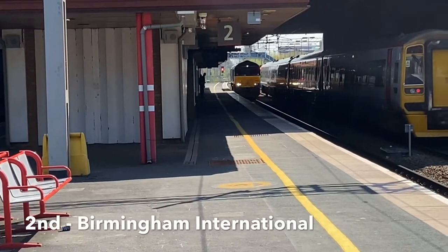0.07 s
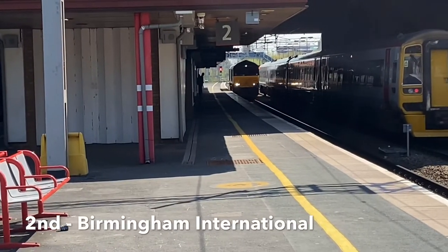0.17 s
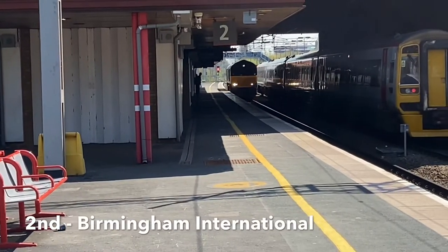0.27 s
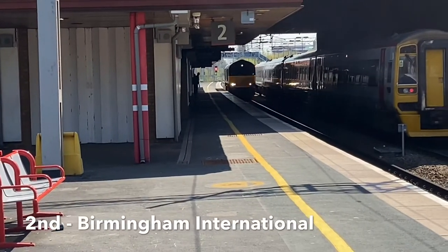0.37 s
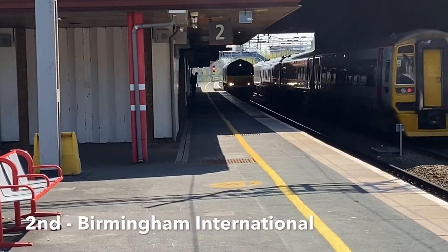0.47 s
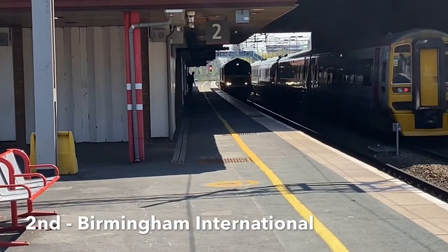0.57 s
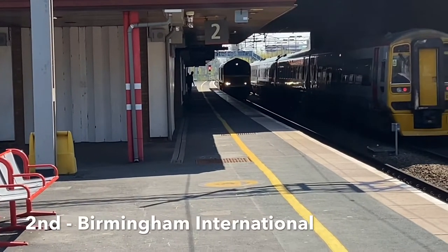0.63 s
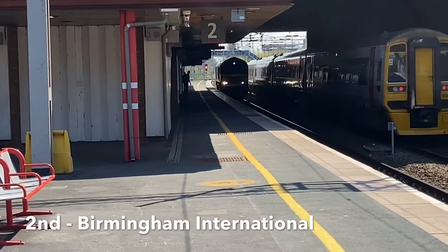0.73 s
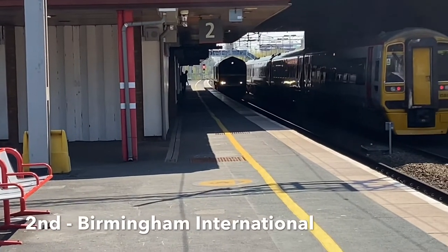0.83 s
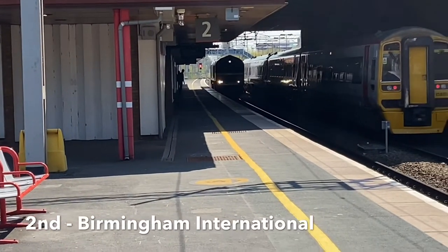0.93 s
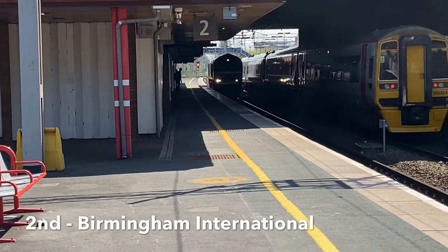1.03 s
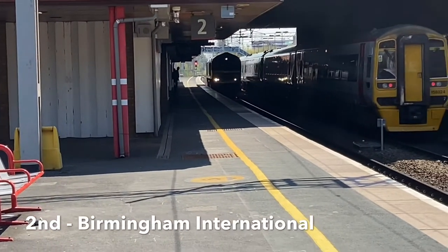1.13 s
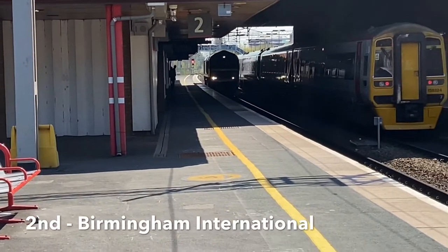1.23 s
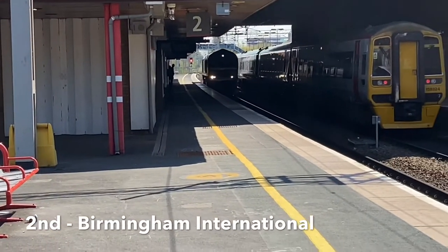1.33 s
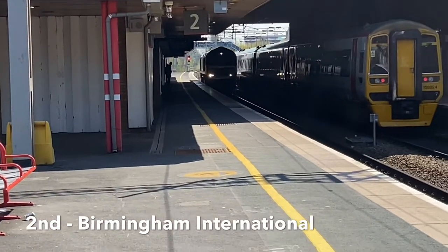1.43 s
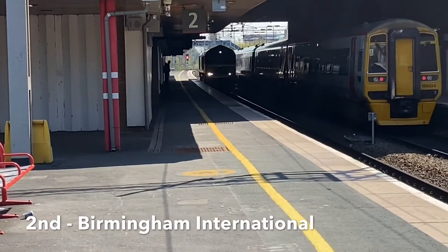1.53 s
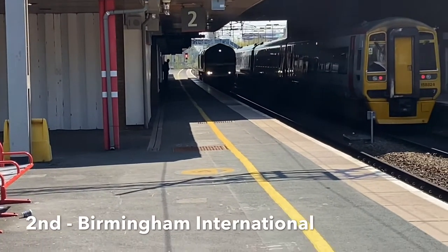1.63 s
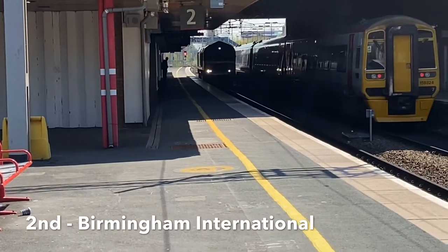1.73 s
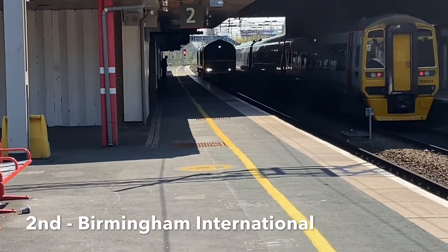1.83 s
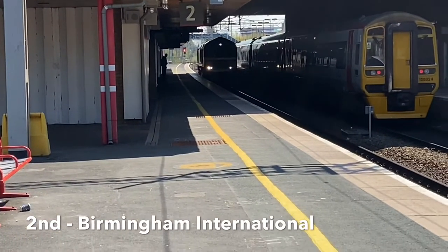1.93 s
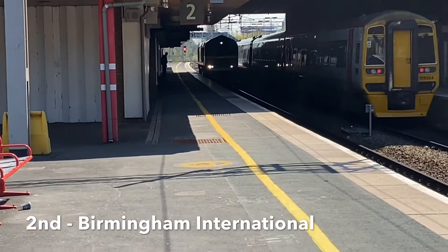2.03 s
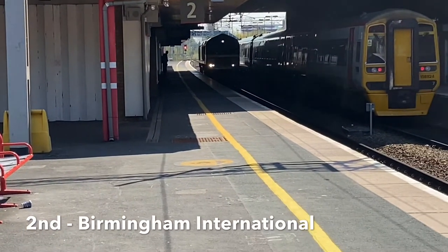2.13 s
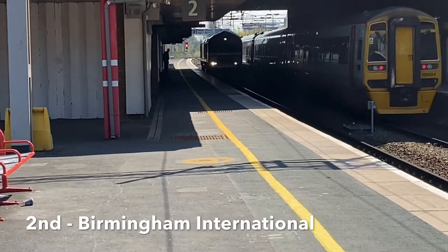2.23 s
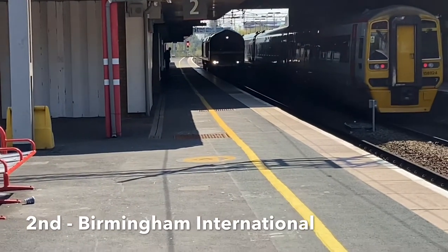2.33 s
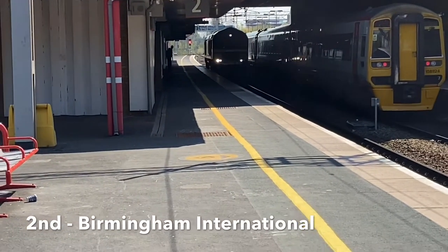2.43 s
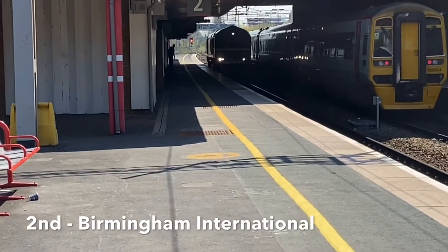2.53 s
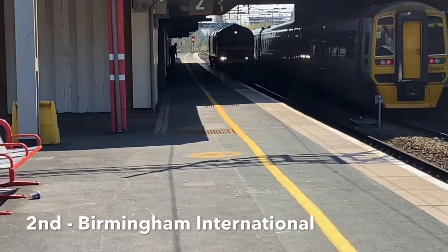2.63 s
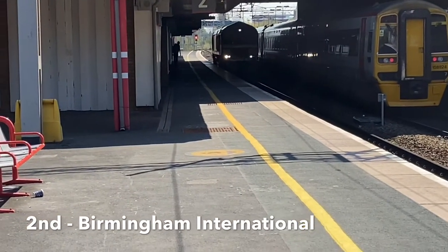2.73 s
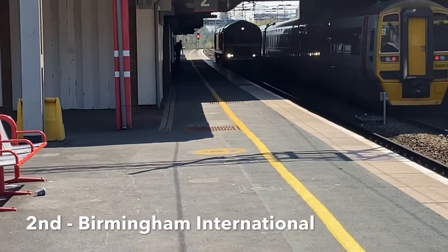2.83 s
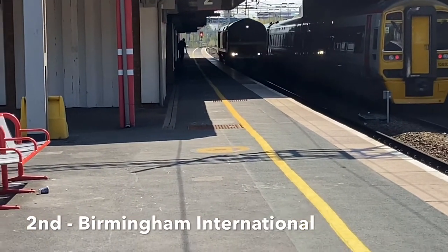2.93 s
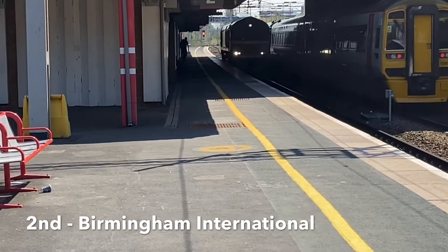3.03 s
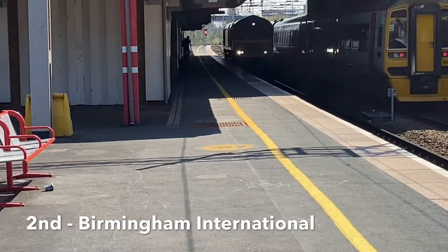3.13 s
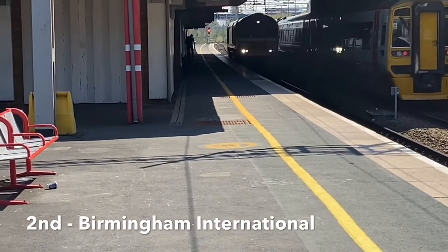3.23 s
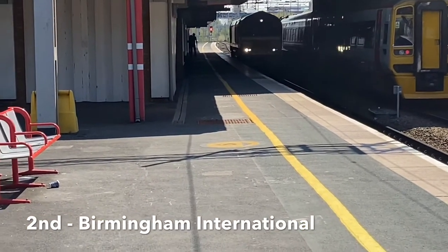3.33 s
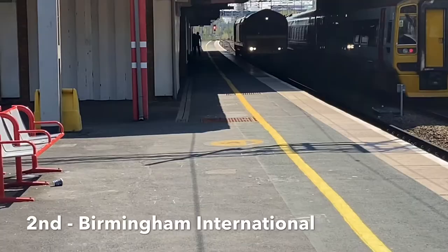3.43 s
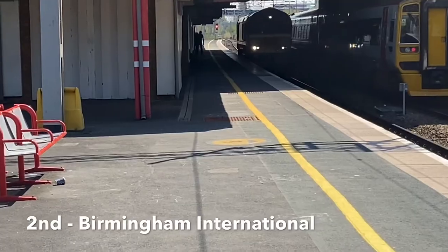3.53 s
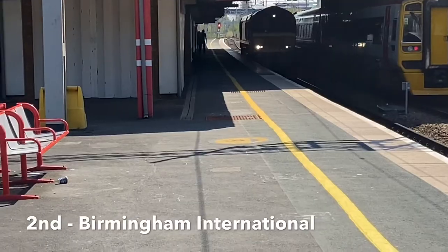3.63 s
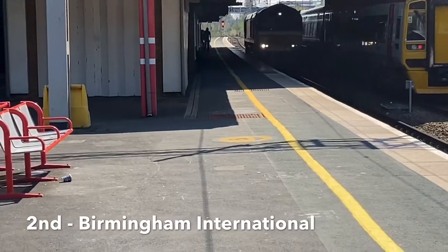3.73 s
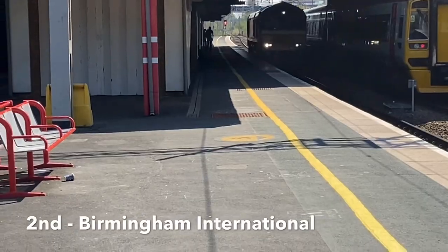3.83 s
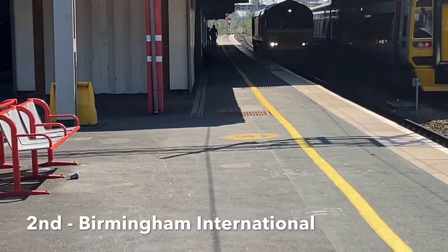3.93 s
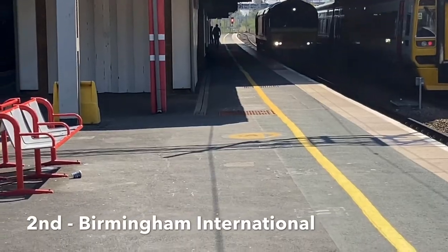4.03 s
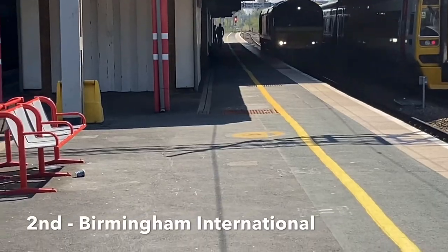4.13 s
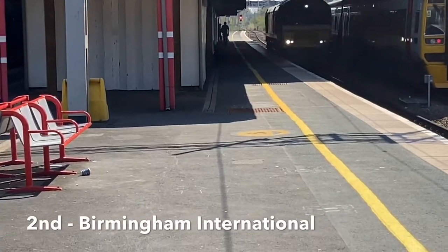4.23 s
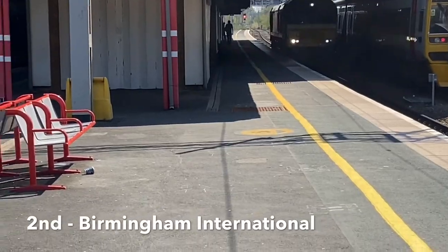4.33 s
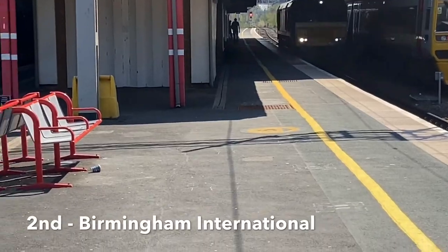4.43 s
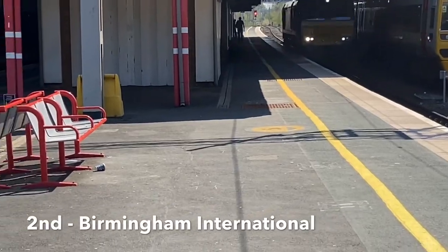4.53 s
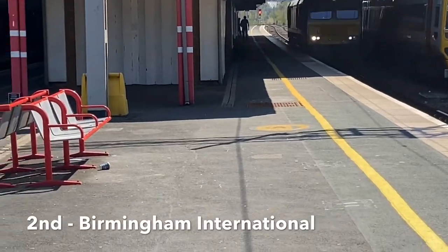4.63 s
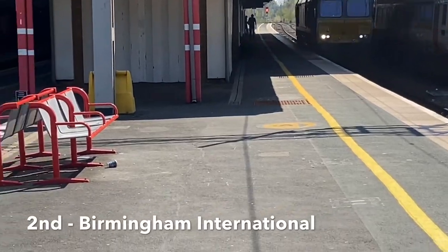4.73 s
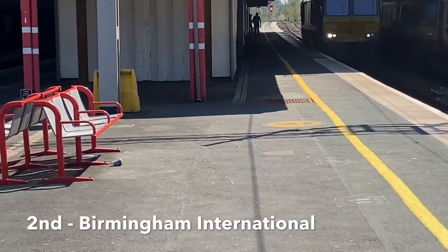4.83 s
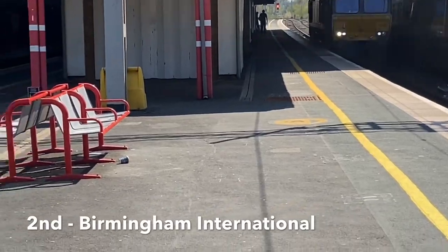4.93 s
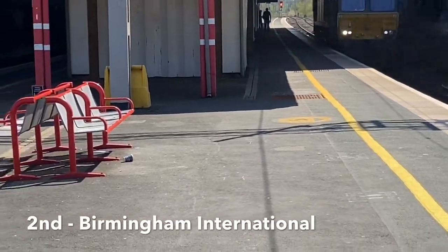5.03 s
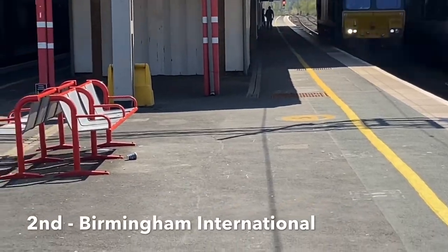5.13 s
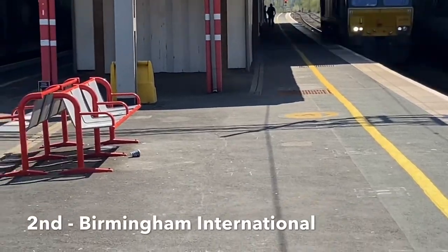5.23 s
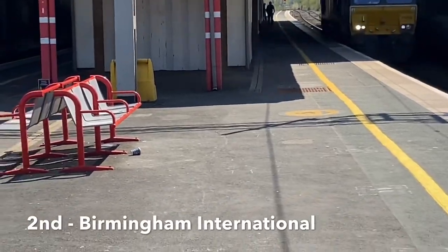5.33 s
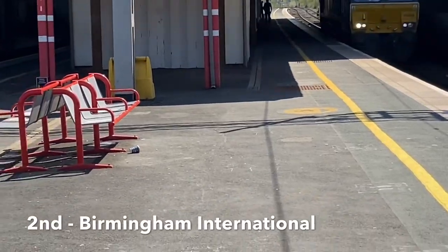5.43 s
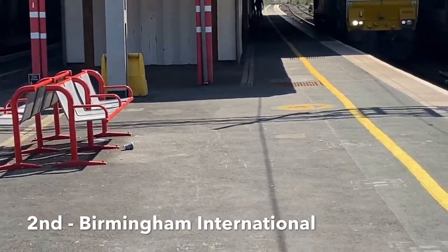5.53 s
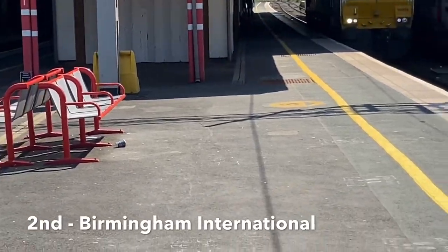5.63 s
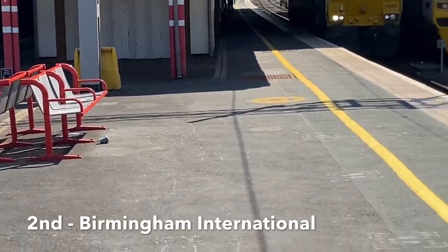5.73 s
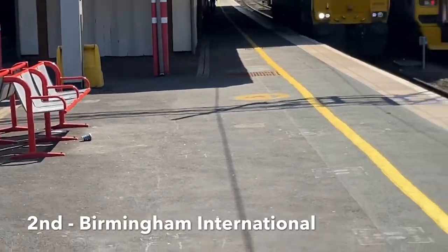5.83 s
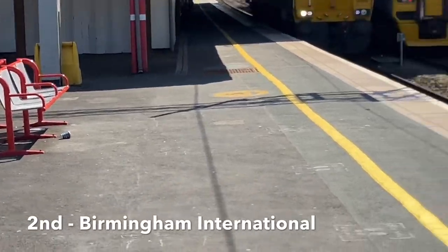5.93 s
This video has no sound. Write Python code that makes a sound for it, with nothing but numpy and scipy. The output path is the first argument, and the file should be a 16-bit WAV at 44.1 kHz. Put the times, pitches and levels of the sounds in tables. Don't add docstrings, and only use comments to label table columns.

```python
import sys
import numpy as np
from scipy import signal
from scipy.fft import rfft, irfft, next_fast_len
from scipy.io import wavfile
from scipy.ndimage import uniform_filter1d, map_coordinates

SR = 44100
rng = np.random.default_rng(int(sys.argv[2]) if len(sys.argv) > 2 else 0)


def voltage_ratio(level):
    return 10 ** (np.asarray(level, float) / 20)


def unload_audio(sound):
    columns = np.transpose(np.atleast_2d(sound))
    steps = np.round(np.clip(columns, -1, 1) * 32767)
    wavfile.write(sys.argv[1], SR, steps.astype(np.int16))


N = 264159

# time in seconds, crankshaft turns in Hz, blower whine in Hz.
ENGINE_SPEED = [
    (0, 14.3, 2500),
    (1.2, 14.2, 2500),
    (2, 14.05, 2502),
    (3.6, 14.05, 2470),
    (4.4, 14.25, 2510),
    (4.95, 14.4, 2566),
    (5.2, 14.55, 2592),
    (5.45, 14.75, 2653),
    (5.7, 14.95, 2728),
    (6, 15.2, 2710),
]
# multiple of the shaft, level under the roar in dB.
SIDE_ORDERS = [
    (2, -16),
    (4, -13),
    (6, -10.5),
]
# time in seconds, level of wheels and body in dB.
APPROACH = [(0, -40.5), (.3, -39.5), (.62, -39), (.7, -36), (.8, -37.5), (1.45, -36), (1.9, -34),
            (2.4, -32), (2.9, -31.5), (3.38, -30), (3.5, -28), (3.85, -26), (4.3, -24.5), (4.55, -23),
            (4.95, -21.5), (5.45, -21), (5.7, -20), (5.99, -19.5)]
# frequency in Hz, density in dB per Hz.
ROAR_SPECTRUM = [(12, -34.5), (20, -12.5), (32, -5.5), (75, 1), (134, -2.5), (182, -5.5), (226, -12),
                 (300, -18), (390, -38), (660, -120)]
FAR_ROAR_SPECTRUM = [(12, -40), (20, -9.5), (48, -1.5), (86, -15.5), (118, -2.5), (150, -6.5), (182, -3),
                     (216, -9.5), (300, -12.5), (390, -36.5), (660, -120)]
BODY_SPECTRUM = [(130, -10), (220, -6), (312, 0), (468, -4), (560, -11.5), (651, -4), (996, -14),
                 (1140, -14), (1330, -16), (1550, -15), (1860, -20), (2100, -22.5), (2730, -37.5),
                 (4620, -120)]
HISS_SPECTRUM = [(1500, -55), (1900, -11.5), (2200, 0.5), (2500, -2.5), (2850, -6.5), (3300, -8.5),
                 (3800, -14), (4200, -14.5), (4700, -16), (5200, -20), (5600, -28), (6500, -69.5)]
AIR_SPECTRUM = [(5000, -37.5), (5600, 1), (6300, -1), (7000, -0.5), (7600, -7.5), (8200, -10), (8650, -19),
                (9050, -42.5), (9650, -16), (11500, -15.5), (12200, -20), (12650, -38.5), (14300, -38),
                (15600, -67)]
FLOOR_SPECTRUM = [(5000, -38), (7000, -1), (8400, -3.5), (9000, -31), (9700, -1), (12200, -1.5),
                  (12700, -31.5), (15000, -61)]
# frequency in Hz, side over mid in dB.
STEREO_WIDTH = [(40, -32.5), (500, -13.5), (1900, -9), (2150, -31.5), (7450, -52), (7700, -8.5),
                (8300, 4.5), (9000, 21.5), (9700, 9), (10300, -7), (11300, -20.5), (12000, -5), (12900, 21),
                (14300, 2)]
# frequency in Hz, left minus right in dB.
STEREO_LEAN = [(60, 0), (140, -.5), (330, -.5), (500, 1), (770, -2.5), (1180, -1), (1900, 0), (2100, 0)]
# frequency in Hz, gain in dB.
PORT_RESPONSE = [(8300, 0), (8750, -12), (9000, -30), (9350, -14), (9700, 0), (12300, 0), (12900, -18),
                 (13600, -20), (14300, -8)]
# time in seconds, change in dB, half length in seconds.
THIRD_FADES = [(.5, -9, 0.12), (1.0, -8, 0.53), (1.585, -2, .06), (1.895, 5, 0.29), (2.27, -14, 0.1),
               (3.488, 4, .08), (3.688, -8.5, .07), (4.228, 3, .06), (4.603, -7.5, 0.13),
               (4.992, -8, 0.053), (5.698, -12, .07), (5.874, -1.5, 0.043), (5.99, -20, .04)]
FIFTH_SWELLS = [(.05, 9.9, 0.42), (.68, 8, .08), (1.2, 14, 0.26), (1.75, 11, .12), (2.22, 8.8, 0.027),
                (2.6, 5, .08), (2.95, 15, 0.11), (3.5, 7.6, 0.15), (4.17, 11.2, .1), (4.57, 12.1, 0.11),
                (5.05, 14, 0.098), (5.3, 11.7, .17), (5.68, 19.5, 0.08), (5.99, 12, .05)]
FAN_SWELLS = [(1.0, 6, .2), (1.5, 9, 0.075), (1.72, 13, 0.051), (2.22, 14, 0.085), (2.6, 10, 0.057),
              (3.5, 19.8, 0.057), (3.84, 16.4, 0.16), (4.22, 12, .05), (4.55, 11, .12), (4.99, 8.8, 0.081),
              (5.47, 14, 0.21), (5.869, 16, 0.082)]
# time in seconds, roar change in dB, half length in seconds.
JOINT_THUMPS = [(.36, 4, .08), (.7, 6, 0.051), (1.15, 2.5, 0.12), (1.51, -7, 0.025), (2.0, -1, .04),
                (2.95, 1.5, 0.039), (3.2, 1, .12), (3.49, 7, 0.028), (3.64, 3, 0.036), (3.82, 3, .04),
                (4.55, 2, 0.068), (4.85, 5, 0.063), (5.0, 2.5, 0.035), (5.73, 3, .03), (5.85, 2, .05)]
# time in seconds, gain in dB, octave level in dB, half length in seconds.
BLOWER_SURGES = [
    (1.33, 10, -64, .03),
    (1.55, 11, -63, .04),
    (1.78, 10, -64, .035),
    (2.0, 10, -63, .035),
    (4.97, 3, -56, .04),
    (5.15, 4, -50, .03),
    (5.31, 0, -49, .05),
    (5.5, 2, -52, .03),
]
# time in seconds, whine in dB, idle hum in dB.
RAILCAR_LEVELS = [
    (0, -60, -47),
    (.45, -58, -44),
    (.7, -58, -39.5),
    (1.1, -61, -36.5),
    (1.35, -56.5, -52),
    (2.3, -53, -52),
    (3.2, -53.5, -50),
    (6, -59.5, -52),
]
# time in seconds, pitch in Hz, level in dB, half length in seconds.
FLANGE_SQUEAKS = [
    (.85, 4080, -58, .014),
    (1.53, 4520, -60, .035),
    (2.21, 4540, -58, .04),
    (4.9, 1520, -36, .03),
]
# time in seconds, peak in dB, pitch in Hz, top ring in dB.
GRIT_TICKS = [
    (1.32, -52, 5500, -8),
    (2.572, -54, 10500, -2),
    (5.1115, -36, 5100, -16),
    (5.682, -27, 6500, -25),
    (5.779, -14, 4800, -16),
    (5.822, -21, 6000, -24),
    (5.845, -39, 5200, -6),
    (5.871, -42, 5000, -6),
]
# time in seconds, level in dB, fading time in seconds.
AIR_SPITS = [
    (2.565, -74, .04),
    (3.46, -73, 0.09),
    (4.83, -62.5, 0.11),
    (5.67, -63, 0.11),
    (5.77, -58.5, 0.11),
]

MIDWAY_DB = -30
ROAR_LAW, HISS_LAW, AIR_LAW = (-22, 1.19), (-49.5, 1.13), (-69.5, 1.4)
THIRD_LAW, FIFTH_LAW, FAN_LAW = (-23, 1.08), (-34.5, 1.11), (-39.5, 0.95)
BLOWER_LAW, GEAR_LAW, MOTOR_LAW = (-59, 1.3), (-63, 1.3), (-56, 1.3)
CLEAR_S, CLEAR_LASTS_S, CLEAR_DB = 4.85, .12, 8
IDLE_HZ = 14.5
BLOWER_DB_PER_HZ, HISS_DB_PER_HZ, AIR_DB_PER_HZ = 6, 1.5, 5.5
JOINT_HISS, JOINT_AIR = .2, .5
FLOOR_DB = -91


def unit(x):
    return x / np.sqrt(np.mean(np.abs(x) ** 2) + 1e-20)


def along(points, hz):
    f, v = np.transpose(points)
    return np.interp(np.log(hz + 1), np.log(f + 1), v)


def ramp(times_s, values):
    return np.interp(np.arange(N) / SR, times_s, values)


def curves(rows):
    times_s, *columns = np.transpose(rows)
    return [ramp(times_s, column) for column in columns]


def bumps(rows):
    t = np.arange(N) / SR
    return sum(size * np.exp(-((t - s) / half_s) ** 2) for s, size, half_s in rows)


def wobble(rate_hz):
    knots = rng.standard_normal(int(N * rate_hz / SR) + 4)
    return map_coordinates(knots, [np.arange(N) * rate_hz / SR])


def filtered(x, response):
    m = next_fast_len(N + 8192)
    return irfft(rfft(x, m) * response(np.fft.rfftfreq(m, 1 / SR)), m)[..., :N]


def rush(spectrum, patchy_db):
    z = signal.stft(rng.standard_normal((2, N)), nperseg=512)[2]
    field = uniform_filter1d(rng.standard_normal(z.shape[1:]), size=5, axis=0)
    field = uniform_filter1d(field, size=12, axis=1)
    pair = signal.istft(z * voltage_ratio(patchy_db * unit(field)), nperseg=512)[1][:, :N]
    pair = filtered(pair, lambda hz: voltage_ratio(along(spectrum, hz) + [0 * hz, along(STEREO_WIDTH, hz)]))
    return pair / np.std(pair[0])


def tone(hz, blur_hz, rough):
    share = np.clip(rough, 0, 1)
    scatter = unit(wobble(blur_hz) + 1j * wobble(blur_hz))
    carrier = np.exp(2j * np.pi * (np.cumsum(hz * np.ones(N)) / SR + rng.random()))
    return np.sqrt(2) * np.real((np.sqrt(1 - share) + np.sqrt(share) * scatter) * carrier)


def closing(law, size=1):
    midway_db, grows = law
    return midway_db + grows * (uniform_filter1d(curves(APPROACH)[0], size=size) - MIDWAY_DB)


def effort():
    return np.clip(curves(ENGINE_SPEED)[0] - IDLE_HZ, 0, None)


def roar():
    thump_db = bumps(JOINT_THUMPS)
    body_db = curves(APPROACH)[0]
    roar_db = closing(ROAR_LAW, size=SR // 4) + thump_db
    hiss_db = closing(HISS_LAW) + HISS_DB_PER_HZ * effort() + JOINT_HISS * thump_db
    air_db = closing(AIR_LAW) + AIR_DB_PER_HZ * effort() + JOINT_AIR * thump_db
    firing = np.sin(2 * np.pi * np.cumsum(6 * curves(ENGINE_SPEED)[0]) / SR)
    near = ramp([1.2, 3.4], [0, 1])
    direct = np.sqrt(near) * rush(ROAR_SPECTRUM, patchy_db=-0.74)
    distant = np.sqrt(1 - near) * rush(FAR_ROAR_SPECTRUM, patchy_db=-1.1)
    out = voltage_ratio(roar_db - 2.5) * (direct + distant)
    out += voltage_ratio(body_db + 0.86 + 0.13 * wobble(13)) * rush(BODY_SPECTRUM, patchy_db=0.79)
    out += voltage_ratio(hiss_db + 5.5 + 0.21 * wobble(8.8) + 0.24 * firing) * rush(HISS_SPECTRUM, patchy_db=-0.86)
    out += voltage_ratio(air_db + 0.3 + 0.54 * wobble(24) + .7 * firing) * rush(AIR_SPECTRUM, patchy_db=1.5)
    return out + voltage_ratio(FLOOR_DB) * rush(FLOOR_SPECTRUM, patchy_db=2.8)


def exhaust():
    shaft_hz, _ = curves(ENGINE_SPEED)
    third_db = closing(THIRD_LAW, size=SR // 2) + bumps(THIRD_FADES)
    fifth_db = closing(FIFTH_LAW, size=SR // 2) + bumps(FIFTH_SWELLS)
    fan_db = closing(FAN_LAW, size=SR // 2) + bumps(FAN_SWELLS)
    roar_db = closing(ROAR_LAW, size=SR // 2)
    far_db = ramp([.5, 3], [-9, 0])
    out = voltage_ratio(third_db - 1.7) * tone(3 * shaft_hz, blur_hz=2.7, rough=0.036)
    out += voltage_ratio(fifth_db + .5 * far_db - 0.8) * tone(5 * shaft_hz, blur_hz=11, rough=.35)
    out += voltage_ratio(fan_db - 2.0) * tone(7.3 * shaft_hz, blur_hz=12, rough=.5)
    for order, under_db in SIDE_ORDERS:
        line = tone(round(order) * shaft_hz, blur_hz=1.5 * order, rough=.06 * order)
        out += voltage_ratio(roar_db + far_db + under_db) * line
    return out


def whines():
    shaft_hz, blower_hz = curves(ENGINE_SPEED)
    blower_db, gear_db, motor_db = (closing(law, size=SR // 2) for law in (BLOWER_LAW, GEAR_LAW, MOTOR_LAW))
    blower_db = blower_db + BLOWER_DB_PER_HZ * effort()
    blower_db += ramp([CLEAR_S, CLEAR_S + CLEAR_LASTS_S], [0, CLEAR_DB])
    surge_db = bumps([(s, gain_db, half_s) for s, gain_db, _, half_s in BLOWER_SURGES])
    octave = bumps([(s, voltage_ratio(octave_db), half_s) for s, _, octave_db, half_s in BLOWER_SURGES])
    echo_db = ramp([5, 5.6], [-6, 1])
    out = voltage_ratio(blower_db + surge_db + .8 * wobble(9)) * tone(blower_hz, blur_hz=60, rough=.55)
    out += octave * tone(1.99 * blower_hz, blur_hz=150, rough=.75)
    out += voltage_ratio(blower_db + echo_db) * tone(.955 * blower_hz, blur_hz=200, rough=0.99)
    out += voltage_ratio(gear_db + 0.78 * wobble(6.1)) * tone(1.825 * blower_hz, blur_hz=130.3, rough=0.84)
    return out + voltage_ratio(motor_db + 2.3 * wobble(8)) * tone(79.5 * shaft_hz, blur_hz=56.2, rough=0.77)


def wheels():
    body_db = uniform_filter1d(curves(APPROACH)[0], size=SR // 4)
    return voltage_ratio(body_db - 18 + 1.1 * wobble(3)) * tone(650, blur_hz=45.02, rough=1.0)


def railcar():
    whine_db, hum_db = curves(RAILCAR_LEVELS)
    whine = voltage_ratio(whine_db) * tone(2308, blur_hz=8, rough=0.08)
    return whine + voltage_ratio(hum_db) * tone(127, blur_hz=4.6, rough=0.24)


def squeaks():
    out = np.zeros(N)
    for s, hz, db, half_s in FLANGE_SQUEAKS:
        out += bumps([(s, voltage_ratio(db), half_s)]) * tone(hz, blur_hz=150, rough=.7)
    return out


def grit_ticks():
    out, u = np.zeros(N), np.arange(600) / SR
    for s, db, hz, top_db in GRIT_TICKS:
        puff = voltage_ratio(top_db) * rng.standard_normal(600)
        top_ring = voltage_ratio(top_db) * np.sin(2 * np.pi * 11800 * u)
        snap = np.sin(2 * np.pi * hz * u) + .5 * puff + top_ring
        envelope = voltage_ratio(db - 60 * u / .003) * (1 - np.exp(-u / .00015))
        out[round(s * SR):][:600] += envelope * snap
    return filtered(out, lambda hz: voltage_ratio(along(PORT_RESPONSE, hz)))


def air_puffs():
    t = np.arange(N) / SR
    level = np.zeros(N)
    for s, db, fading_s in AIR_SPITS:
        level += voltage_ratio(db) * np.exp(-np.abs(t - s) / np.where(t > s, fading_s, .004))
    return level * rush(FLOOR_SPECTRUM, patchy_db=2.0)


def scene():
    mid, side = roar() + air_puffs()
    fade = np.clip(np.arange(N) / 200, 0, 1)
    lines = fade * (exhaust() + whines() + wheels() + railcar() + squeaks())
    apart = filtered(lines, lambda hz: 1j * voltage_ratio(along(STEREO_WIDTH, hz)) * (hz < 3000))
    ticks = grit_ticks()
    mid = mid + lines + ticks
    side = side + apart + .2 * ticks
    ports = fade * np.array([mid + side, mid - side])
    return filtered(ports, lambda hz: voltage_ratio(along(STEREO_LEAN, hz) * [[.5], [-.5]]))


def band_limit(x):
    return signal.sosfilt(signal.butter(12, 15500, fs=SR, output="sos"), x)


def record(dry):
    flat = dry / (1 + np.abs(dry) ** 24) ** (1 / 24)
    return band_limit(flat)


dry = scene()
out = record(dry)
unload_audio(out)
```